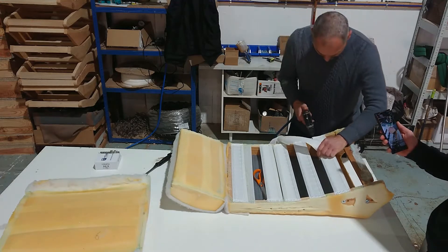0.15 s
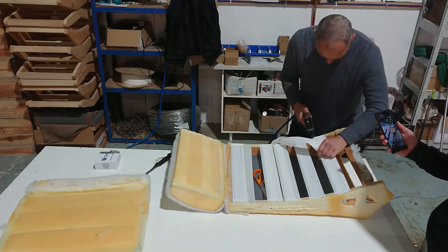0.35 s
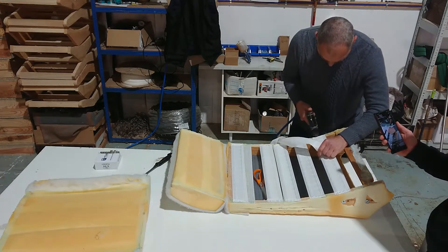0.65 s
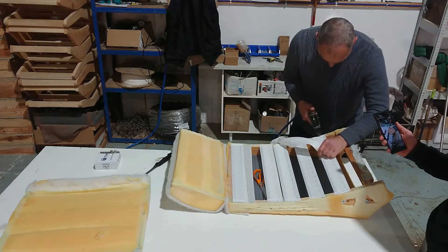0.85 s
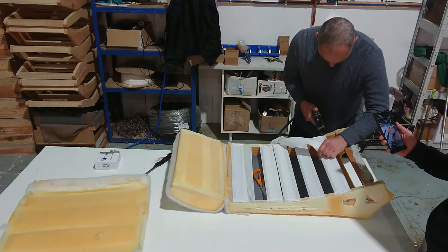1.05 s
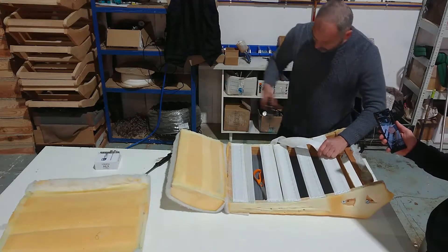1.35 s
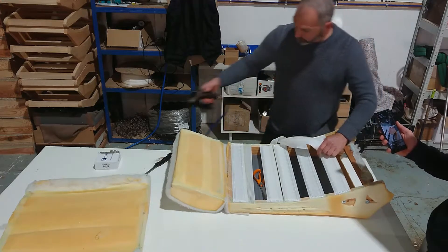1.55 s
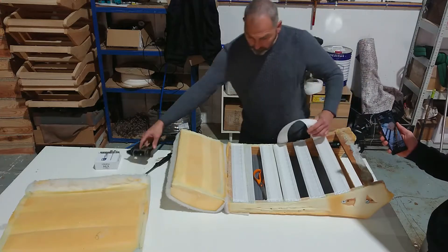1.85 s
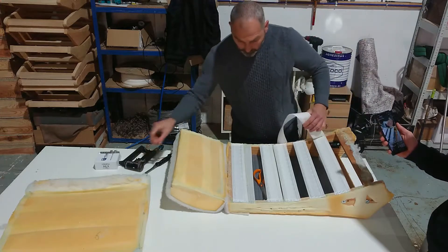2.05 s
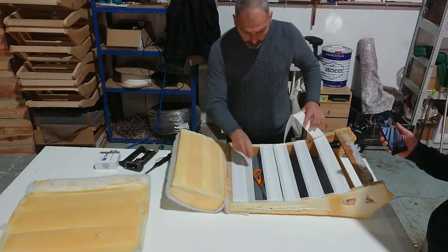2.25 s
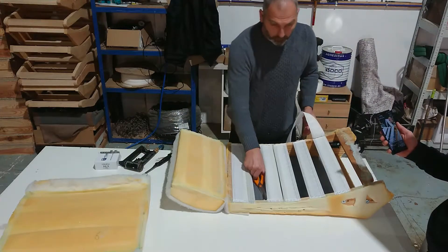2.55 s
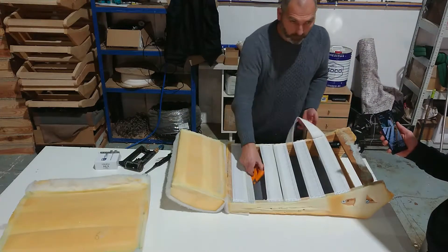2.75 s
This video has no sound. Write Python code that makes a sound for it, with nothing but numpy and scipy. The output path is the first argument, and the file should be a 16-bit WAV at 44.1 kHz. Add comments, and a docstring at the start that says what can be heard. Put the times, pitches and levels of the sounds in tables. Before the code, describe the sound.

Five sharp air stapler shots ring through a workshop before the tool is set down.

```python
"""A pneumatic staple gun fires five staples into a wooden frame, a few metres from a stereo pair of
microphones in a bare, ringing workshop. The nose ticks against the wood; then each shot is a valve hiss,
a crack and a ring of frame and steel, and on each trigger release the piston thumps back and air vents.
Cloth rustles as the gun is carried to a table, where it knocks, tips over and settles.
Quiet room tone and a low hum lie underneath."""
import sys
import numpy as np
from scipy import signal
from scipy.fft import rfft, irfft
from scipy.io import wavfile
from scipy.ndimage import uniform_filter1d, minimum_filter1d

SR = 44100
rng = np.random.default_rng(int(sys.argv[2]) if len(sys.argv) > 2 else 0)


def log_audio(samples):
    """Write samples as a 16-bit WAV file to the path given in sys.argv[1]."""
    # one column per channel
    frames = np.atleast_2d(samples).T
    # limit to full scale, then quantise
    limited = np.clip(frames, -1, 1)
    pcm = np.round(limited * 32767).astype(np.int16)
    wavfile.write(sys.argv[1], SR, pcm)


N = 127890

# staples driven (time [s], crack [dB], frame ring [dB], escaping air [dB], crack tilt [dB/octave])
SHOTS = [(.4830, -7.5, -9, -22, -0.5), (0.7632, -6.5, -11, -25.5, 1), (0.9776, -7.5, -17.5, -30.5, 1.5),
         (1.159, -7, -10, -27.5, 0.5), (1.2989, -8.5, -13.5, -26.5, 0.7)]
# piston returns after the trigger is let go (time [s], thump [dB], exhaust [dB])
RETURNS = [(0.6427, -12.5, -24.5), (0.897, -13, -24.5), (1.0922, -16, -26.5), (1.2541, -14.5, -27.5),
           (1.424, -14, -26)]
# the gun meets the table (time [s], table ring [dB], thud [dB], casing ring [dB], clack [dB])
KNOCKS = [(2.1467, -10.5, -13, -6.5, -14.5), (2.1955, -20.5, -19, -14, -23),
          (2.2031, -20.5, -15, -9.5, -14.5), (2.2213, -9, -14, -23.5, -22.5), (2.2281, -18, -18, -24, -31),
          (2.2560, -15.5, -17.5, -28, -37)]

# ringing modes (frequency [Hz], relative level [dB], t60 [s])
STEEL_MODES = [(2310, -1, .04), (3150, -5, .04), (3400, -3, .06), (4400, -6, .05), (5110, -3, .05),
               (6380, -2, .09), (6550, -4, .16), (7130, 0, .08), (7930, 0, .04), (9230, -7, .03)]  # the gun's nose and magazine
FRAME_MODES = [(95, -21, .2), (180, -17, .08), (435, -8, .03), (480, 0, .065), (890, 3, .05),
               (1050, -10, .03), (1170, -12, .035), (1300, -10, .035)]  # the frame with the gun pressed on it
TABLE_MODES = [(115, -11, .2), (186, 0, .2), (226, -5, .17), (331, -1, .13), (387, 1, .095), (440, -3, .05),
               (492, -3, .09), (529, -1, .11), (594, -11, .1)]  # the table top under the gun
CASING_MODES = [(948, 0, .08), (1010, -4, .05), (1078, -1, .08), (1170, -15, .07), (1260, -13, .09),
                (2120, -17, .05), (2385, -15, .05)]  # the gun's casing

# noise spectra (frequency [Hz], relative level [dB])
ROOM_TONE_SPECTRUM = [(20, -18), (40, -5.5), (59, 12.5), (80, -4), (200, -15.5), (600, -16.5),
                      (2000, -20.5), (6500, -30.5), (8500, -43), (15000, -50)]  # the workshop's still air
CRACK_SPECTRUM = [(100, -24), (280, -6), (480, 6), (650, 0), (900, 6), (1700, 1), (3500, 4), (5000, 2.5),
                  (7000, 6), (9200, -1), (11000, -12), (15500, -12)]  # metal clatter of the driver
VALVE_SPECTRUM = [(300, -7.5), (2000, -1.5), (7000, -20.5), (9500, -1), (12000, -7.5), (15500, 5.5)]  # hiss ahead of a shot
AIR_SPECTRUM = [(150, -23.5), (500, -9), (2200, 15.5), (3000, 6), (5000, 16), (6700, 8.5), (8300, -38.5),
                (11000, -8.5), (15500, -24.5)]  # air escaping after a shot
EXHAUST_SPECTRUM = [(150, -8.5), (480, 11), (680, 9.5), (950, 10.5), (2000, 6.5), (4000, 5.5), (6800, 6),
                    (8000, -6), (9500, -2), (11500, -10), (15500, -3.5)]  # the cylinder venting
RUSTLE_SPECTRUM = [(100, -10), (300, 3), (800, 2), (1600, -2), (4000, 2), (12000, -37)]  # cloth and webbing
THUD_SPECTRUM = [(40, -32), (75, -8), (110, -4), (180, -3), (260, -5), (440, 4), (720, -12), (1150, -4),
                 (1600, -16), (3000, -31), (15000, -66)]  # a knock in the table
CLACK_SPECTRUM = [(200, -6), (1000, 3), (1600, 2), (2300, 7), (3500, 2), (5000, -3), (6200, -2),
                  (8000, -12), (10000, -18), (15000, -27)]  # a knock in the casing

# the workshop's reverberation (frequency [Hz], t60 [s], relative level [dB])
REVERB = [(70, 0.51, 4.5), (153, 1.3, -3), (368, 1.14, -7.5), (1043, 1.55, -9), (2170, 1.43, -2),
          (4800, 1.42, -6), (7260, 1.44, -3), (8720, 0.68, -8.5), (14000, 0.51, 3)]
# the lag between the microphones varies with pitch, widening the ring near 1 kHz
# (frequency [Hz], lag factor [ratio])
LAG_STRETCH = [(250, 0.45), (1000, 2), (2200, 0.82), (4500, 0.98), (9000, 1.164)]
# left microphone over the right (frequency [Hz], level [dB])
MIC_BALANCE = [(250, -2.5), (600, -1.5), (2200, -2), (4500, 0), (12000, -1.5)]

FRAME_CONTACT_HZ = 2000  # a softer contact has a lower edge
BIN_HZ = np.fft.rfftfreq(N, 1 / SR)


def undb(db):
    return 10 ** (np.asarray(db) / 20)


def along(hz, table, column=1):
    """Read a table on a log-frequency axis."""
    table = np.array(table, float)
    return np.interp(np.log(np.maximum(hz, 1)), np.log(table[:, 0]), table[:, column])


def colour(x, spectrum, tilt_db=0, size=4096):
    """Minimum-phase filter with this spectrum, tilted by tilt_db an octave; white noise keeps its power."""
    hz = np.arange(size // 2 + 1) * SR / size
    gain = undb(along(hz, spectrum) + tilt_db * np.log2(hz + 1))
    cepstrum = irfft(np.log(gain))
    cepstrum[1:size // 2] *= 2
    cepstrum[size // 2 + 1:] = 0
    impulse = irfft(np.exp(rfft(cepstrum)))
    return signal.fftconvolve(x, impulse / np.linalg.norm(impulse))[:N]


def since(start):
    return np.maximum(np.arange(N) / SR - start, 0)


def fade(t, t60):
    return np.exp(-np.log(1000) * t / t60)


def burst(start, rise, hold, t60):
    """White noise that rises, holds and dies away; all times in seconds."""
    envelope = np.minimum(since(start) / rise, 1) * fade(since(start + rise + hold), t60)
    return rng.standard_normal(N) * envelope


def ring(start, modes, contact_hz, detune=0.002):
    """Modes struck at one instant through a soft contact, at nearly the same pitch on each blow."""
    t, out = since(start), 0
    for hz, db, t60 in modes:
        pitch = hz * (1 + detune * rng.standard_normal())
        out += undb(db) * fade(t, t60) * np.cos(2 * np.pi * pitch * t)
    contact = signal.butter(3, contact_hz, fs=SR, output="sos")
    out = signal.sosfilt(contact, out * (t > 0) + 1e-18)
    return out / np.linalg.norm([undb(db) for _, db, _ in modes])


def diffuse(alike_below_hz=733, pan_db=-0.5):
    """Noise reaching the microphones from all sides: alike in the bass, unrelated in the treble."""
    alike = 1 / (1 + (BIN_HZ / alike_below_hz) ** 2)
    mid, side = rfft(rng.standard_normal((2, N))) * np.sqrt([(1 + alike) / 2, (1 - alike) / 2])
    return irfft(np.array([mid + side, mid - side]), N) * undb([[pan_db / 2], [-pan_db / 2]])


def room_tone(hum_hz=63.7):
    """Quiet air all round the microphones, and a low hum."""
    air = np.array([colour(side, ROOM_TONE_SPECTRUM) for side in diffuse()])
    return undb(-49) * air + undb(-77.5) * np.sin(2 * np.pi * hum_hz * since(0))


def nose_tick(start=0.4485):
    """A light tick and a short ring of steel as the gun is set against the wood."""
    tick = colour(burst(start, rise=0.0011, hold=0.00073, t60=0.036), CRACK_SPECTRUM, tilt_db=-3)
    return undb(-24.5) * tick + undb(-27.5) * ring(start, STEEL_MODES, contact_hz=3810)


def firing_strokes():
    """Around each crack: the valve hisses, the piston scrapes down, frame and steel ring, air escapes."""
    valve = scrape = frame = steel = air = 0
    for start, _, frame_db, air_db, _ in SHOTS:
        valve += undb(-28) * burst(start - 0.007, rise=0.001, hold=0.002, t60=0.011)
        scrape += undb(-20.5) * burst(start - 0.003, rise=0.0005, hold=0.0099, t60=0.013)
        frame += undb(frame_db) * ring(start + 0.001, FRAME_MODES, FRAME_CONTACT_HZ)
        # the driver hits its stop
        steel += undb(-17.5) * ring(start + 0.0026, STEEL_MODES, contact_hz=12000)
        air += undb(air_db) * burst(start, rise=0.016, hold=0.025, t60=0.1)
    lead_in = colour(valve, VALVE_SPECTRUM) + colour(scrape, CRACK_SPECTRUM, tilt_db=-5)
    return lead_in + frame + steel + colour(air, AIR_SPECTRUM)


def staple_cracks(common_share=0.6):
    """The driver slams each staple home in a brief metal clatter, much alike from shot to shot."""
    shape = dict(rise=0.0007, hold=0.0025, t60=0.016)
    common, out = burst(0, **shape), 0
    for start, db, _, _, tilt_db in SHOTS:
        repeated = np.sqrt(common_share) * np.roll(common, int(start * SR))
        own = np.sqrt(1 - common_share) * burst(start, **shape)
        out += undb(db) * colour(repeated + own, CRACK_SPECTRUM, tilt_db)
    return out


def piston_returns(swing_s=0.00092, ring_hz=370, ring_t60=0.029):
    """The cylinder vents and the piston lands with one soft pressure swing and a short ring."""
    thump = exhaust = 0
    for start, thump_db, exhaust_db in RETURNS:
        exhaust += undb(exhaust_db) * burst(start - 0.0083, rise=0.0043, hold=0.018, t60=0.11)
        u = (np.arange(N) / SR - start) / swing_s
        swing = (u ** 2 - 1) * np.exp(-u ** 2 / 2)
        tone = ring(start + 0.00063, [(ring_hz, 0, ring_t60)], FRAME_CONTACT_HZ)
        thump += undb(thump_db) * (swing + undb(-8) * tone)
    return thump + colour(exhaust, EXHAUST_SPECTRUM)


def cloth_rustle():
    """Cloth and webbing rub faintly while the gun is carried to the table."""
    return undb(-50.5) * colour(burst(1.41, rise=0.0652, hold=0.49, t60=0.94), RUSTLE_SPECTRUM)


def table_knocks():
    """Each knock rings and thuds in the table, and rings and clacks in the gun's casing."""
    top = thud = casing = clack = 0
    for start, top_db, thud_db, casing_db, clack_db in KNOCKS:
        top += undb(top_db) * ring(start, TABLE_MODES, contact_hz=890)
        thud += undb(thud_db) * burst(start, rise=0.00052, hold=0.005, t60=0.098)
        casing += undb(casing_db) * ring(start, CASING_MODES, contact_hz=1540)
        clack += undb(clack_db) * burst(start, rise=0.000047, hold=0.001, t60=0.019)
    return top + colour(thud, THUD_SPECTRUM) + casing + colour(clack, CLACK_SPECTRUM)


def workshop(x, bands=18, walls_db=-2, early_db=-7, onset_s=0.014):
    """Clutter scatters the sound briefly, and the bare walls ring on."""
    t, noise, walls = since(0), rfft(diffuse()), 0
    centres = np.geomspace(50, 16000, bands)
    for hz, pick in zip(centres, np.eye(bands)):
        band = irfft(noise * np.interp(np.log(BIN_HZ + 1), np.log(centres), pick), N)
        walls += band * undb(walls_db + along(hz, REVERB, column=2)) * fade(t, along(hz, REVERB))
    walls *= np.sqrt(2 * np.log(1000) / SR)  # gives noise with a 1 s t60 unit energy
    early = diffuse() * fade(t, t60=0.16)
    early *= undb(early_db) / np.linalg.norm(early[0])
    response = (walls + early) * np.minimum(t / onset_s, 1)
    return signal.fftconvolve(x, response, axes=1)[:, :N]


def at_microphones(x, lag_s, pan_db):
    """The left microphone hears the source later by lag_s times a factor that varies with frequency."""
    delay = lag_s * along(BIN_HZ, LAG_STRETCH)
    left = irfft(rfft(x) * np.exp(-2j * np.pi * BIN_HZ * delay), N)
    return np.array([left * undb(pan_db / 2), x * undb(-pan_db / 2)])


def scene():
    """Gun and table stand a few metres off, near the centre of the pair, with the workshop all round."""
    spread = 0.62  # share of the crack's power that the frame scatters unevenly to the two sides
    gun = nose_tick() + firing_strokes() + np.sqrt(1 - spread) * staple_cracks()
    gun += piston_returns() + cloth_rustle()
    scattered = np.sqrt(spread) * np.array([staple_cracks(), staple_cracks()])
    knocks = table_knocks()
    direct = at_microphones(gun, lag_s=0.000075, pan_db=-0.5) + scattered
    direct += at_microphones(knocks, lag_s=-0.00012, pan_db=0)
    return room_tone() + direct + workshop(gun + scattered + knocks)


def record(dry):
    """Two slightly unequal microphones; the recorder thins the bass, limits peaks and cuts the top."""
    low_cut_hz, top_hz = 67, 15900
    ceiling, window = 0.84, int(0.002 * SR)
    balance_db = along(BIN_HZ, MIC_BALANCE)
    x = irfft(rfft(dry) * undb(np.array([balance_db, -balance_db]) / 2), N)
    x = signal.sosfilt(signal.butter(3, low_cut_hz, "high", fs=SR, output="sos"), x)
    needed_gain = ceiling / np.maximum(np.abs(x).max(0), ceiling)
    gain = uniform_filter1d(minimum_filter1d(needed_gain, window), window)
    return signal.sosfilt(signal.ellip(8, 0.2, 70, top_hz, fs=SR, output="sos"), x * gain)


dry = scene()
out = record(dry)
log_audio(out)
```